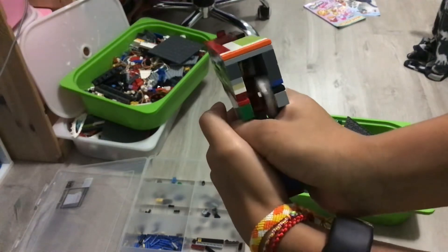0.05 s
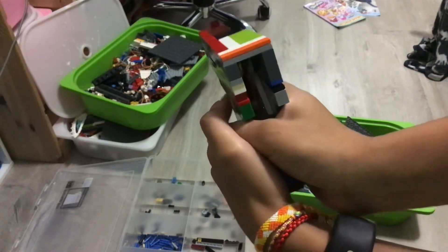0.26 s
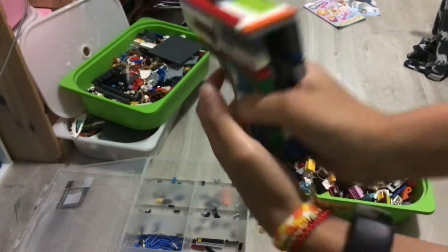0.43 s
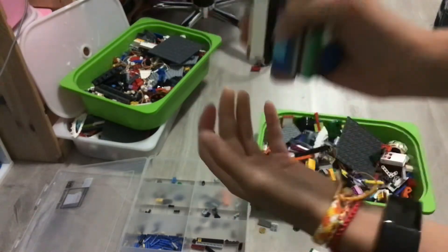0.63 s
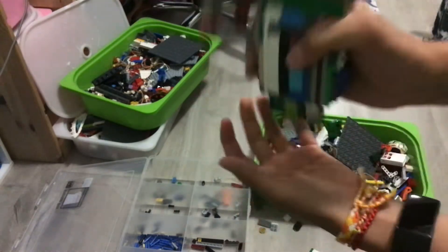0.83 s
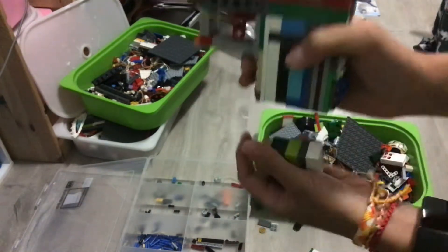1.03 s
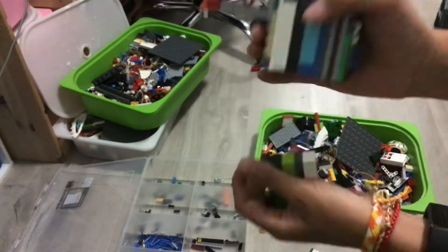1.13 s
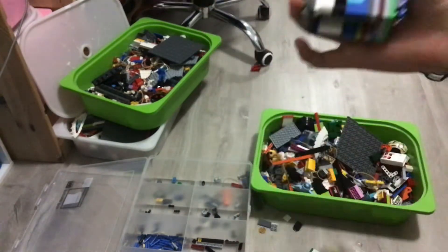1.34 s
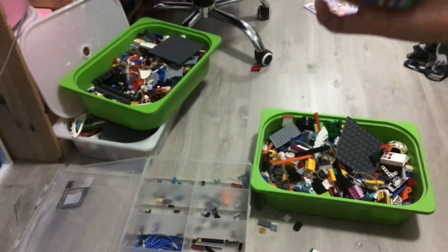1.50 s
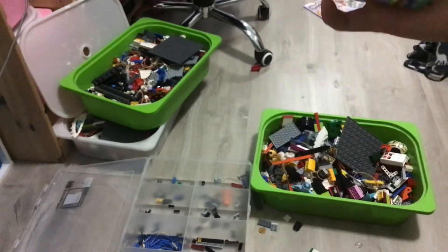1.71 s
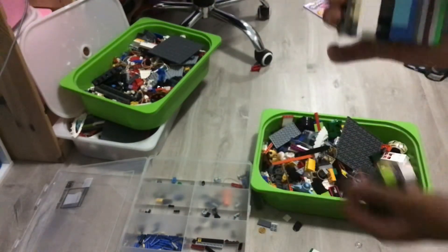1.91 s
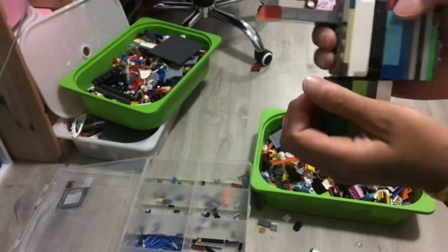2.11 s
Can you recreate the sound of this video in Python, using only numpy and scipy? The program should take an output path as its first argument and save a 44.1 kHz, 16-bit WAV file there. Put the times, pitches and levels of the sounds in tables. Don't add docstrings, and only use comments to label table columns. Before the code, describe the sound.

Close to the microphone, a plastic brick toy creaks briefly and snaps hard with rapid bouncing clacks; a small block slides faintly into a palm, then after near silence clicks back in, in a quiet room.

```python
import sys
import numpy as np
from scipy import signal
from scipy.fft import rfft, irfft
from scipy.io import wavfile
from scipy.ndimage import uniform_filter1d

SR = 44100
rng = np.random.default_rng(int(sys.argv[2]) if len(sys.argv) > 2 else 0)


def decibels_to_gain(level_db):
    exponent = np.asarray(level_db, float) / 20
    return 10 ** exponent


def transcribe(signal):
    frames = np.atleast_2d(signal).T
    limited = np.clip(frames, -1, 1)
    pcm = np.round(limited * 32767).astype(np.int16)
    wavfile.write(sys.argv[1], SR, pcm)


N = 94815
LEAD = 2048
TOTAL = N + LEAD

# (time [s], level [dB], chatter [ms], low modes [dB], high modes [dB])
TRIGGER_CONTACTS = [(-.02, -26.5, 12, 5.5, -0.5), (.0635, -57.5, 2, 0, 0.5), (.087, -29, 1.2, -0.5, -5),
                    (.097, -46, 3, 5, -7), (.1562, -29.5, 1.7, 4.5, 1), (.212, -35, 4, 6, -5.5),
                    (.2159, -5, 1.6, -10.5, -8), (.2237, -11, 2.2, -10.5, -2.5),
                    (.2305, -14.5, 1.5, -12, -5), (.2362, -22.5, 2.5, -20, -4), (.242, -32, 2, -12.5, -3),
                    (.389, -60, 3, 8.5, -11), (.434, -66, 13, 5.5, -13)]
# (time [s], level [dB], chatter [ms], low modes [dB], high modes [dB])
BLOCK_CONTACTS = [(.7462, -43, 2.46, -5, 2), (.753, -43.5, 1, -8.5, -15), (.772, -59, 4.4, 7.5, -12),
                  (.8063, -55, 1.2, -10, 8), (.8123, -43, 1.7, -12, 3), (.831, -52.5, 3, 8, 1),
                  (.8789, -52, 1.44, -19, 19.5), (.8887, -45, 3.7, -0.5, -11),
                  (.9282, -65, 1.67, -12, 10.5), (1.3135, -81.5, 3.2, 10, -5), (2.0502, -29, 1.5, -7.5, 3),
                  (2.0524, -32.5, 1.46, 5, 5), (2.06, -46, 6, -1, -3.5), (2.0905, -43.5, 6.6, 2, -28),
                  (2.0937, -38.5, 2.14, -3, 4.5), (2.125, -49, 8.7, 2.5, -12),
                  (2.134, -41.5, 2.25, 2.5, -4), (2.14, -51.5, 6, 1, -9.5)]
# (frequency [Hz], width [Hz], level [dB])
FRAME_MODES = [(590, 100, -28.5), (1050, 390, -27), (1460, 200, -20), (1850, 400, -12.5),
               (2550, 570, -10.5), (3140, 400, -6.5), (3950, 400, -14), (4803, 520, -1), (5750, 230, -8),
               (6710, 500, -5.5), (7660, 300, -10), (8365, 700, -2.5), (10800, 1800, -26),
               (14100, 2000, -26.5)]
# (frequency [Hz], width [Hz], level [dB])
BLOCK_MODES = [(630, 54, -7.5), (1063, 92, -10.5), (1820, 92, 1.5), (2954, 350, -2), (3960, 380, -2),
               (5067, 230, -4), (6122, 350, -5), (7824, 660, -4.5), (9090, 440, -9), (11000, 4500, -19.5),
               (14100, 1200, -34)]
# (time [s], rise [s], fall [s], level [dB])
SCRAPES = [
    (0.774, 0.0034, 0.012, -55.5),
    (.83, .008, 0.0096, -41.5),
    (.846, 0.0071, .008, -54.5),
]
# (frequency [Hz], width [Hz], level [dB])
HOLLOW_MODES = [(624, 37, -4), (1350, 230, 3.5), (1940, 990, 2), (2900, 2130, -2), (4950, 1900, -9),
                (8000, 520, -14)]
# (time [s], level [dB], pitch [Hz], 60 dB decay [s], sag time [s])
KNOCKS = [
    (.216, -39.5, 426, 0.082, 0.0042),
    (.2165, -38, 662, 0.043, 0.38),
    (.217, -47, 140, 0.093, 0.18),
    (0.835, -55.5, 117.8, 0.11, 0.21),
    (1.313, -60.5, 1314, 0.012, 0.0066),
    (1.995, -55, 800, 0.045, 0.0051),
    (2.051, -49, 672, 0.1, 0.073),
    (2.054, -56, 109.6, 0.089, 0.071),
    (2.134, -52, 493, .05, 0.0058),
]
# (time [s], effort [dB])
RUB_EFFORT = [(0, -100), (.62, -92.5), (0.721, -65.5), (0.899, -67), (.98, -75), (1.2, -86.5),
              (1.44, -92.5), (1.47, -74), (1.58, -74.5), (1.68, -73.5), (2.0, -79.5), (2.15, -82)]
# (frequency [Hz], density [dB per Hz])
SKIN_SPECTRUM = [(700, -12.5), (1240, 1.5), (2000, -5), (3400, -1.5), (6500, -2.5), (8300, -4.5),
                 (10000, -13), (16000, -23)]
# (time [s], half length [s], level [dB])
SWELLS = [
    (0.846, 0.0597, -63.5),
    (0.985, 0.11, -71),
    (1.58, 0.045, -79),
    (1.88, 0.063, -65),
]
# (frequency [Hz], density [dB per Hz])
CLOTH_SPECTRUM = [(100, -11.5), (250, 5), (600, 0.5), (900, -8), (1300, -14), (3000, -39)]
# (frequency [Hz], density [dB per Hz])
AIR_SPECTRUM = [(28, -24), (55, 1.5), (130, -1), (300, -8), (700, -14), (950, -25), (4400, -29.5),
                (16500, -41.5)]
# (frequency [Hz], 60 dB decay [s])
ROOM_DECAY = [(200, .1), (1000, 0.28), (3000, 0.19), (5500, 0.19), (9000, 0.17), (15000, .2)]
# (frequency [Hz], level [dB])
ROOM_TONE = [(700, -3), (1800, -3.5), (3200, -0.5), (4600, -2), (6000, 2), (12000, -5)]
# (frequency [Hz], gain [dB])
MIC_RESPONSE = [(30, -20.5), (45, -0.5), (15300, -1.5), (16300, -12)]


def read(points, hz):
    f, value = np.transpose(points)
    return np.interp(np.log(hz + 1), np.log(f + 1), value)


def evened(x):
    return x / np.sqrt(np.mean(x ** 2) + 1e-20)


def add(mix, s, sound):
    part = mix[LEAD + round(s * SR):][:len(sound)]
    part += sound[:len(part)]


def resonate(x, hz, width):
    radius = np.exp(-np.pi * width / SR)
    angle = 2 * np.pi * min(hz, SR / 2.2) / SR
    return signal.lfilter([1 - radius, 0, radius - 1], [1, -2 * radius * np.cos(angle), radius * radius], x)


def hiss(spectrum, patchy_db):
    frames, hz = N // 256 + 14, np.fft.rfftfreq(1024, 1 / SR)
    real, imag, patches = rng.standard_normal((frames, 513, 3)).T
    patches = uniform_filter1d(patches, size=14, axis=0)
    patches = evened(uniform_filter1d(patches, size=12, axis=1))
    z = (real + 1j * imag) * decibels_to_gain(read(spectrum, hz)[:, None] + patchy_db * patches)
    return evened(signal.istft(z, nperseg=1024, noverlap=768)[1][:TOTAL])


def air():
    return decibels_to_gain(-68) * hiss(AIR_SPECTRUM, patchy_db=0.95)


def room(x):
    gap_s = .003
    late_db, late_stretch = -23, 3
    hz, t, z = signal.stft(rng.standard_normal(SR // 2), SR, nperseg=128)
    fall_db = -60 * t / read(ROOM_DECAY, hz)[:, None]
    decay = decibels_to_gain(fall_db) + decibels_to_gain(late_db + fall_db / late_stretch)
    z = z * decibels_to_gain(read(ROOM_TONE, hz)[:, None]) * decay
    tail = signal.istft(z, SR, nperseg=128)[1]
    tail = tail * np.clip(np.arange(len(tail)) / SR / gap_s, 0, 1) ** 2
    return signal.fftconvolve(x, tail / np.linalg.norm(tail))[:len(x)]


def swells():
    t = (np.arange(TOTAL) - LEAD) / SR
    bumps = sum(decibels_to_gain(db) * np.exp(-((t - s) / half) ** 2) for s, half, db in SWELLS)
    return bumps * hiss(CLOTH_SPECTRUM, patchy_db=5.0)


def rub():
    s, db = np.transpose(RUB_EFFORT)
    effort = decibels_to_gain(np.interp((np.arange(TOTAL) - LEAD) / SR, s, db))
    return effort * hiss(SKIN_SPECTRUM, patchy_db=1.5)


def knocks():
    out, t = np.zeros(TOTAL), np.arange(6000) / SR
    for s, db, hz, t60, sag in KNOCKS:
        phase = 2 * np.pi * hz * sag * np.log(1 + t / sag)
        add(out, s, decibels_to_gain(db - 60 * t / t60) * np.sin(phase))
    return out


def scrapes():
    out, t = np.zeros(TOTAL), np.arange(3000) / SR
    slips = rng.standard_normal((len(SCRAPES), len(t)))
    for (s, rise, fall, db), slip in zip(SCRAPES, slips):
        ring = np.zeros(len(t))
        for hz, width, mode_db in HOLLOW_MODES:
            once = resonate(slip, hz, width * 1.6)
            ring += decibels_to_gain(mode_db) * evened(resonate(once, hz, width * 1.6))
        stroke = np.minimum(t / rise, 1) * np.exp(-(np.maximum(t - rise, 0) / fall) ** 2)
        add(out, s, decibels_to_gain(db) * evened(ring) * stroke)
    return out


def contacts(rows, body):
    settle_db, release_ms = -17.5, 8.93
    grit_db = 2
    low_hz, high_hz = 3500, 7000
    widen, detune = 1.4, .03
    out, ms = np.zeros(TOTAL), np.arange(2500) * 1000 / SR
    chance = rng.standard_normal((len(rows), len(body) + 1, len(ms)))
    tune = rng.uniform(-1, 1, (len(rows), len(body)))
    for (s, db, chatter_ms, low_db, high_db), (grit, *impacts), shifts in zip(rows, chance, tune):
        chatter = np.exp(-(ms / chatter_ms / 1.4) ** 3)
        buzz = decibels_to_gain(settle_db) * np.exp(-ms / release_ms)
        shape = np.minimum(ms / .2, 1) * (chatter + buzz)
        force = decibels_to_gain(grit_db * evened(uniform_filter1d(grit, size=9))) * shape
        ring = np.zeros(len(ms))
        for (hz, width, mode_db), impact, shift in zip(body, impacts, shifts):
            tilt_db = low_db * (hz < low_hz) + high_db * (hz > high_hz) * np.sqrt(hz / high_hz)
            mode = resonate(impact * force, hz * (1 + detune * shift), width * widen)
            ring += decibels_to_gain(mode_db + tilt_db) * evened(mode)
        add(out, s, decibels_to_gain(db - 6.5) * np.sqrt(np.mean(shape ** 2)) * ring)
    return out


def scene():
    toy = contacts(TRIGGER_CONTACTS, FRAME_MODES) + contacts(BLOCK_CONTACTS, BLOCK_MODES)
    toy = toy + scrapes() + knocks()
    mix = air() + decibels_to_gain(-11) * room(toy) + swells() + rub() + toy
    return mix[None, LEAD:]


def band_limit(x):
    return signal.sosfilt(signal.butter(12, 16800, fs=SR, output="sos"), x)


def record(dry):
    x = irfft(rfft(dry[0]) * decibels_to_gain(read(MIC_RESPONSE, np.fft.rfftfreq(N, 1 / SR))), N)
    x = x + decibels_to_gain(-3) * resonate(x, hz=8350, width=700)
    early_ring = resonate(x[::-1], hz=8150, width=55)[::-1]
    x = x + decibels_to_gain(-9) * early_ring
    return band_limit(x[None])


dry = scene()
out = record(dry)
transcribe(out)
```